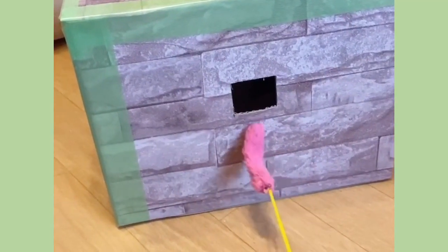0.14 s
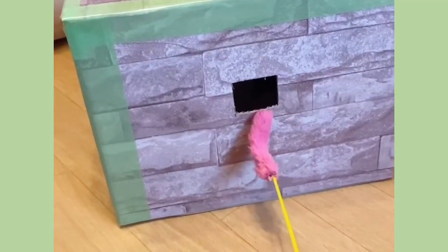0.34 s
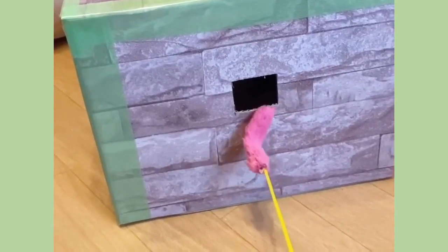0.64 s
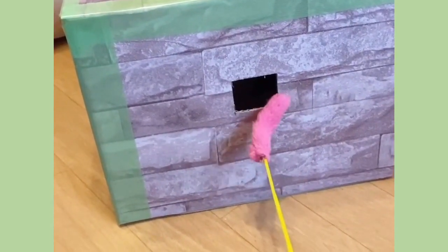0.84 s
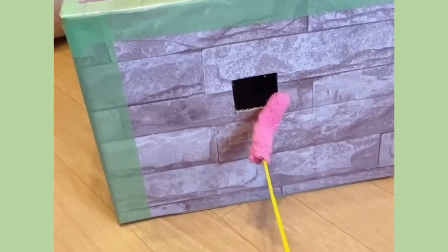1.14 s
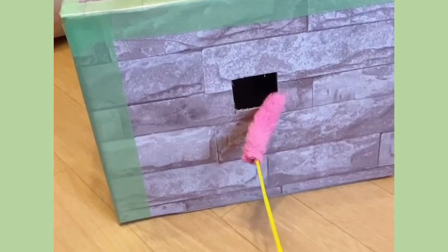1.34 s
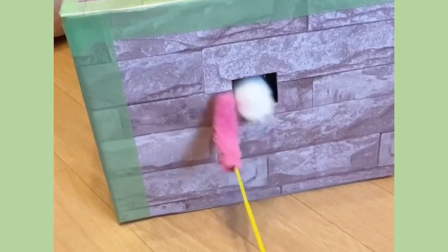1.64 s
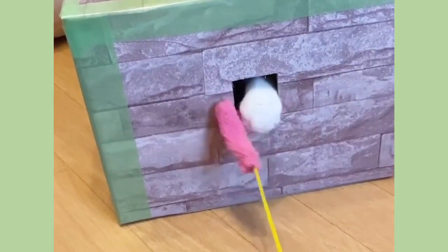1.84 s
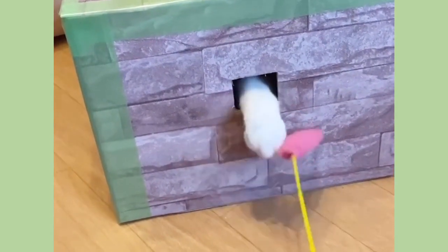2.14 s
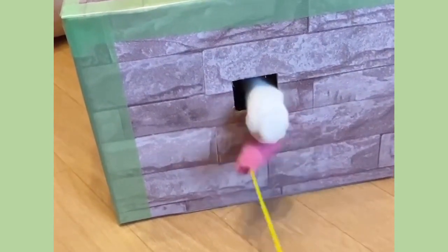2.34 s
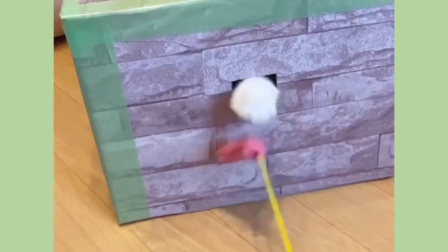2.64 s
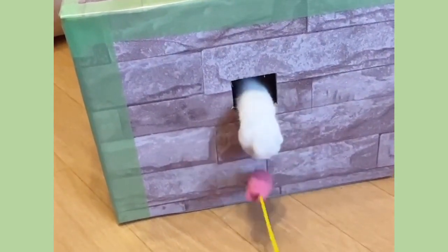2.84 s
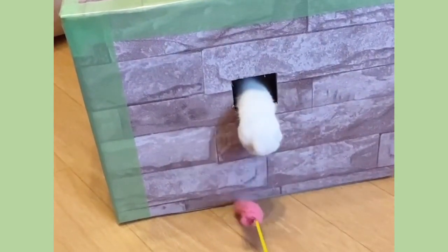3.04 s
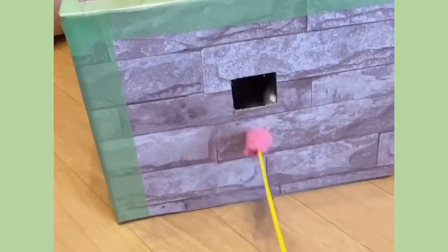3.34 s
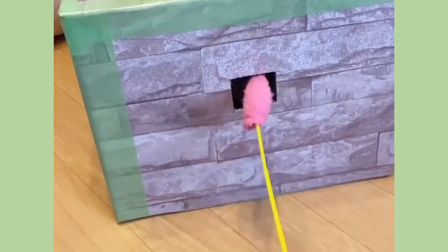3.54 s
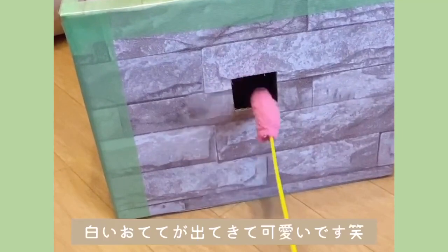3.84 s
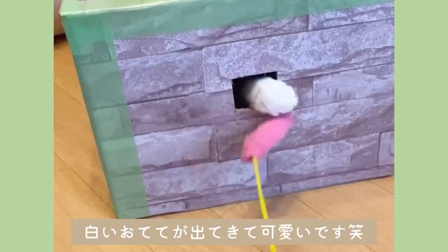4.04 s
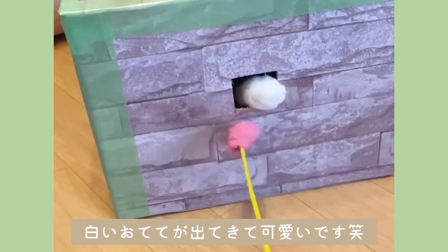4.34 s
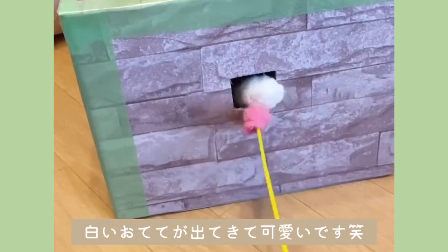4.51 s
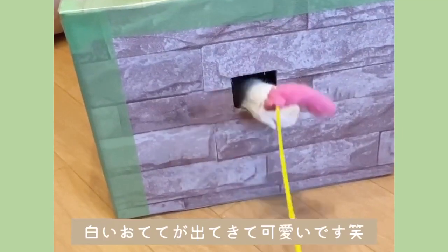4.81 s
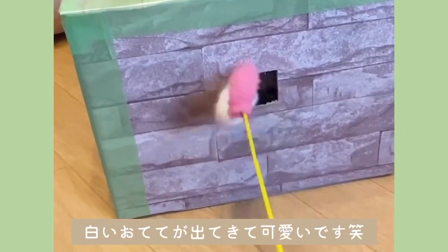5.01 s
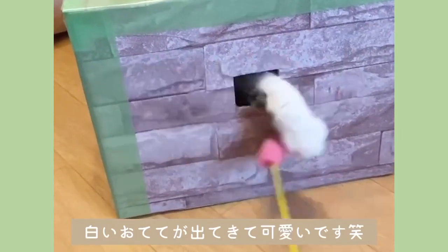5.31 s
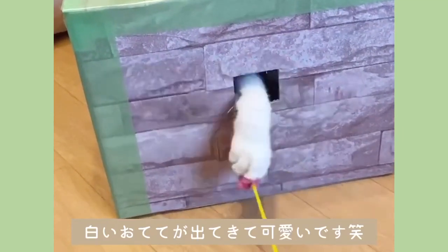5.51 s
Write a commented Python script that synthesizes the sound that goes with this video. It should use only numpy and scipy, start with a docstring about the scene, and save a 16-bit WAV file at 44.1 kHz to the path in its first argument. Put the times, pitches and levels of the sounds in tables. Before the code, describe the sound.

Hollow cardboard thunks, claw ticks and short rasping scrapes as a cat swipes at a toy through a hole, over a faint hum.

```python
"""A quiet room, close to a cardboard box in which a cat swipes at a toy through a small hole.
Impacts excite the damped modes of the walls: soft paws make them boom, hard claws and toy make them tick.
Stick-slip friction rasps and hisses as the leg drags over the rim, and the plush toy swishes on the card.
A short reverberation follows, and an appliance hums faintly behind it all."""
import sys
import numpy as np
from scipy import signal
from scipy.fft import rfft, irfft
from scipy.io import wavfile
from scipy.ndimage import uniform_filter1d

SR = 44100
rng = np.random.default_rng(int(sys.argv[2]) if len(sys.argv) > 2 else 0)


def wrap_up_sound(samples):
    """Save the sound to the file named by the first command line argument, as 16-bit audio."""
    columns = np.atleast_2d(samples).T
    # keep every value between -1 and 1, then stretch to whole-number steps
    tamed = np.clip(columns, -1, 1)
    steps = np.round(tamed * 32767).astype(np.int16)
    wavfile.write(sys.argv[1], SR, steps)


N = 250047
T = np.arange(N) / SR
FREQ = np.arange(N // 2 + 1) * SR / N

# Normal modes of the box. Each row: frequency in Hz, relative level in dB.
BOX_MODES = [(68, -27.5), (89, -3.5), (124, -4.5), (142, -1.5), (165, -2), (197, 5), (238, 5), (268, 6.5),
             (298, 3), (338, -2.5), (410, 1.5), (515, -6), (630, 2), (760, 0), (920, 2), (1110, -2.5),
             (1250, 2), (1410, 2.5), (1640, 1.5), (2040, 3.5), (2250, -13), (2750, -1), (3150, -1),
             (3900, -2), (4700, -16)]
MODE_HZ, MODE_DB = np.transpose(BOX_MODES)
# Strokes of the leg over the rim. Each row: time of full speed in seconds, hold in seconds,
# rasp level in dB, hiss level in dB.
RIM_STROKES = [(0.14, 0.12, -101, -91), (0.47, .02, -93, -91), (0.685, 0.073, -96, -87.5),
               (1.56, 0.023, -49, -63.5), (1.67, 0.021, -48.5, -74), (1.748, 0.074, -66, -76.5),
               (1.881, 0.0045, -79, -70), (1.941, 0.061, -56.5, -61.5), (2.031, 0.0095, -58.5, -71),
               (2.103, 0.003, -73, -71), (2.216, 0.028, -66.5, -78), (2.313, 0.081, -69.5, -77.5),
               (2.438, 0.03, -76, -79), (2.596, .015, -68.5, -76.5), (2.694, 0.0034, -69, -74),
               (2.73, 0.035, -80.5, -86), (2.858, 0.0021, -65, -84), (3.153, 0.036, -59, -70.5),
               (3.313, 0.0086, -58, -71.5), (3.357, 0.088, -65, -79.5), (3.553, 0.28, -82.5, -85),
               (3.861, .03, -79, -81), (3.986, 0.082, -63, -71.5), (4.093, 0.11, -65, -80),
               (4.547, 0.01, -63.5, -70.5), (4.613, 0.045, -71, -74), (4.712, 0.0052, -67, -68.5),
               (4.761, 0.011, -48.5, -58), (4.888, 0.011, -51, -58.5), (4.982, 0.003, -59.5, -64),
               (5.044, 0.0047, -50, -58), (5.1, 0.0091, -68, -73), (5.158, 0.01, -55.5, -62.5),
               (5.215, 0.03, -70.5, -70), (5.308, 0.12, -56.5, -66.5), (5.468, 0.016, -65, -72.5)]


def paw_thumps(sway_hz=135, pad_hz=440, leak_hz=46):
    """Impact excitation: a long, padded contact drives only the low modes; a push at mid-wall sways it."""
    # Each row: time in seconds, peak level in dB, contact in milliseconds, sway of the wall in dB.
    blows = [(1.544, -6.5, 2.63, 1.5), (1.553, -9, 2.03, -17), (1.576, -25.5, 3.1, -15.5),
             (1.607, -20.5, 4.9, -3.5), (1.649, -20.5, 1.2, 6), (1.68, -25, 1.73, 13),
             (1.944, -17, 2.6, 4.5), (1.961, -17, 7.9, 14), (1.972, -14, 5.26, -0.5),
             (1.992, -16, 11.1, 23.5), (2.034, -35, 9.1, -7), (2.342, -41.5, 4.6, 11.5),
             (2.699, -46, 5.3, 8.5), (2.862, -39.5, 1.8, -18.5), (3.179, -23.5, 2.46, 18),
             (3.306, -30.5, 0.96, 6.5), (3.337, -34, 0.23, 1.5), (3.506, -48.5, 3, 15.5),
             (4.007, -37, 4.5, 3.5), (4.077, -40.5, 3.3, 5), (4.122, -34, 4.55, 2), (4.196, -39, 3.36, 7.5),
             (4.596, -39.5, 3.3, 23.5), (4.723, -19.5, 2.15, 11), (4.756, -20.5, 0.75, 12.5),
             (4.779, -14, 1.86, 1), (4.84, -29.5, 3.8, -18), (4.873, -29, 4.9, 0.5), (4.921, -31, 5.1, -18),
             (4.986, -13.5, 7.16, -19), (5.047, -33.5, 5.1, 32), (5.102, -35, 7.7, 29), (5.152, -41, 4, 3),
             (5.295, -35, 4.2, 9.5), (5.317, -35, 1.9, -28), (5.405, -26, 4, 11), (5.418, -34.5, 6.8, -9),
             (5.462, -26, 6.6, -4)]
    out = np.zeros(N)
    # the deepest pressure leaks through the hole
    pad = signal.butter(4, [leak_hz, pad_hz], "band", fs=SR, output="sos")
    sway = 1 / (1 + (MODE_HZ / sway_hz) ** 4)
    for at, db, contact_ms, sway_db in blows:
        spot_db = 2 * rng.standard_normal(len(MODE_HZ))  # each spot struck favours other modes
        weights = undb(sway_db * sway + spot_db) * contact_spectrum(contact_ms)
        boom = box_ring(weights, dispersion=0.042)
        add(out, at - contact_ms / 2000, signal.sosfilt(pad, boom), db)
    return out


def claw_taps(stiff_hz=500, crack_hz=2600, crumple_db=-25, crunch_db=-20):
    """Impact excitation: brief, hard contacts ring the upper modes; flutes crumple, the paper cracks."""
    # Claws, toy and card edges. Each row: start in seconds, level in dB, contact in milliseconds,
    # crack relative to the knock in dB.
    taps = [(1.5425, -11, 0.31, -24.5), (1.6007, -21.5, 0.38, -9.5), (1.6075, -18, 1, -45),
            (1.6385, -21.5, 0.77, -10), (1.6482, -18.5, 0.26, -13.5), (1.6865, -42, .23, 10),
            (1.706, -37.5, .15, -26), (1.926, -40, 0.98, -18), (1.9404, -22.5, 1, -34),
            (2.378, -51.5, 0.19, 4), (2.864, -43.5, 0.39, -12.5), (3.321, -37, 0.13, -9),
            (3.428, -44, .38, 3), (4.115, -41, 0.34, -1.5), (4.143, -42, 0.32, -20), (4.16, -47.5, .2, 2.5),
            (4.191, -44, 0.14, 1), (4.64, -48, 0.36, -8), (4.7585, -29, 0.59, -8),
            (4.779, -28.5, 0.95, -22), (4.914, -36, 0.34, -5), (4.982, -36, 0.82, -9),
            (5.045, -45, 0.17, 6), (5.168, -46, 0.21, 15), (5.364, -38, 0.56, -20),
            (5.412, -36, 0.24, -4.5), (5.488, -44.5, 0.25, 0.5), (5.646, -51.5, 0.11, 11.5)]
    out, t = np.zeros(N), T[:SR // 3]
    skin = signal.butter(1, crack_hz, "high", fs=SR)
    upper_modes = 1 / (1 + (stiff_hz / MODE_HZ) ** 6)
    for at, db, contact_ms, crack_db in taps:
        weights = contact_spectrum(contact_ms) * upper_modes * undb(rng.standard_normal(len(MODE_HZ)))
        knock = box_ring(weights, dispersion=0.012, t60_s=0.085)
        burst = rng.standard_normal(len(t)) * fade(t, t60=0.024)
        crumple = rng.standard_normal(len(t)) * fade(t, t60=0.0099)
        knock = knock + undb(crumple_db) * signal.fftconvolve(knock, crumple)[:len(t)]
        crunch = rng.laplace(size=len(t)) * fade(t, t60=0.34)  # bent fibres crackle on
        crack = signal.lfilter(*skin, burst + undb(crunch_db) * crunch)
        add(out, at, knock / np.abs(knock).max() + undb(crack_db) * crack / np.abs(crack).max(), db)
    return out


def contact_spectrum(contact_ms):
    """A force pulse is a low-pass: it barely drives modes whose period is shorter than the contact."""
    cycles = MODE_HZ * contact_ms / 1000
    return 1 / (1 + cycles ** 4)


def box_ring(weights, dispersion, swell_cycles=0.3, t60_s=0.125):
    """Modal superposition: card damps high modes fastest; dispersive bending waves delay the low ones."""
    hz, db = MODE_HZ[:, None], MODE_DB[:, None]
    delay_s = dispersion * (hz ** -0.5 - hz.max() ** -0.5)
    t = np.maximum(T[:SR // 3] - delay_s, 0)
    build_up = 1 - np.exp(-t * hz / swell_cycles)
    t60 = t60_s * (hz / hz[1]) ** -0.72  # t60_s holds for the second mode
    modes = undb(db) * build_up * fade(t, t60) * np.sin(2 * np.pi * hz * t)
    return np.sum(weights[:, None] * modes, axis=0)


def rim_scrapes(boom_db=7, panel_db=7, panel_q=11):
    """Friction drives resonance: the leg drags over the rim, the card rasps and the walls grumble."""
    # Spectrum of the rasping card. Each row: frequency in Hz, relative level in dB.
    rasp_spectrum = [(250, 1), (600, -9.5), (900, 0.5), (1300, -2), (1750, -4.5), (2100, -8), (2600, -11),
                     (2950, -10), (3500, -17.5), (6000, -19), (12000, -55.5)]
    _, _, rasp_db, _ = np.transpose(RIM_STROKES)
    level = stroke_envelope(rasp_db)
    grit = colour(slips(grain_db=3.8, jerk_db=2, jerk_rate=180), rasp_spectrum)
    # as the contact moves, now one panel mode rings, now another
    panel = sum(resonate(grit, hz, panel_q) * undb(4 * wander(30)) for hz in MODE_HZ[MODE_HZ > 700])
    rasp = grit + undb(panel_db) * panel
    rasp = rasp / band_rms(rasp, 900, 3500)
    wall = box_ring(1 / (1 + (MODE_HZ / 330) ** 6), dispersion=0.03)
    boom = signal.fftconvolve(rng.standard_normal(N) * level, wall / np.linalg.norm(wall))[:N]
    return rasp * level + undb(boom_db) * boom


def fur_hiss():
    """Friction noise: fur hisses against the rim at each stroke, slightly wide in stereo."""
    # Spectrum of the sliding fur. Each row: frequency in Hz, relative level in dB.
    hiss_spectrum = [(1500, -11), (3000, -3), (4400, -2.5), (5200, 1), (6800, -0.5), (8500, 2),
                     (10800, 4.5), (12200, 3), (13000, 1.5), (15500, 0)]
    _, _, _, hiss_db = np.transpose(RIM_STROKES)
    friction = [slips(grain_db=1.5, jerk_db=1.45, jerk_rate=170) for _ in range(2)]
    hairs = np.array([colour(x, hiss_spectrum) for x in friction])
    hairs = hairs / band_rms(hairs[0], 8500, 12000)
    return spread(hairs, wide_hz=1000, width=0.1) * stroke_envelope(hiss_db)


def slips(grain_db, jerk_db, jerk_rate):
    """Stick-slip friction: dense, tiny impulses of uneven size that come in jerks."""
    sizes = undb(grain_db * np.minimum(rng.exponential(size=N), 6))
    catches = rng.random(N) < 0.12
    return rng.choice([-1, 1], N) * catches * sizes * undb(jerk_db * wander(jerk_rate))


def stroke_envelope(levels_db, swell_db_per_s=599, sag_db_per_s=27, release_db_per_s=340):
    """Exponential growth and decay: each stroke swells, sags and dies away; the strongest prevails."""
    out = np.zeros(N)
    for (at, hold_s, _, _), db in zip(RIM_STROKES, levels_db):
        since = T - at
        swell = swell_db_per_s * np.minimum(since, 0)
        sag = sag_db_per_s * np.clip(since, 0, hold_s)
        release = release_db_per_s * np.maximum(since - hold_s, 0)
        out = np.maximum(out, undb(db + np.maximum(swell - sag - release, -120)))
    return out


def toy(rod_at_s=3.548, rod_db=-55, rod_q=10, slide_q=2):
    """Band-limited friction noise: plush swishes along the card, and one graze rings the toy's rod."""
    # Each row: midpoint in seconds, half length in seconds, centre frequency in Hz, level in dB.
    slides = [(0.211, 0.038, 270, -69.5), (0.638, 0.054, 1360, -80.5), (0.711, 0.03, 1130, -70),
              (0.71, 0.042, 313, -72.5), (2.338, 0.12, 1200, -75.5), (3.802, 0.19, 255.3, -67),
              (3.835, 0.15, 610, -79)]
    # Resonances of the thin rod. Each row: frequency in Hz, relative level in dB.
    rod_modes = [(1460, 0.5), (1950, -6.5), (3000, -15.5)]
    out, t = np.zeros(N), T[:SR // 3]
    for at, half_s, hz, db in slides:
        swish = resonate(resonate(rng.standard_normal(N), hz, slide_q), hz, slide_q)
        out += unit(swish) * undb(db) * np.exp(-((T - at) / half_s) ** 2)
    graze = rng.standard_normal(len(t)) * fade(t, t60=0.03) * np.minimum(t / 0.008, 1)
    rod = sum(undb(db) * resonate(resonate(graze, hz, rod_q), hz, rod_q) for hz, db in rod_modes)
    add(out, rod_at_s, rod, rod_db)
    return out


def reverberation(x, first_echo_s=0.015):
    """Diffuse reflections in a small room decay exponentially, the treble absorbed soonest."""
    # Each row: frequency in Hz, reverberation time in seconds.
    decay_times = [(90, .7), (180, 0.43), (350, 0.33), (1200, 0.26), (4000, 0.15), (12000, 0.14)]
    # Each row: frequency in Hz, gain of the tail in dB.
    tail_spectrum = [(80, -22.0), (250, -13.0), (600, -13.5), (2500, -17), (10000, -21.5)]
    hz, t60s = np.transpose(decay_times)
    noise = rfft(rng.standard_normal((2, N)))
    tail = 0
    for share, t60 in zip(np.eye(len(hz)), t60s):
        band = irfft(noise * np.interp(np.log(FREQ + 1), np.log(hz), share), N)
        envelope = fade(T, t60) * np.clip(T / first_echo_s - 1, 0, 1)
        tail = tail + band * envelope / np.linalg.norm(envelope)
    response = spread(colour(tail, tail_spectrum), wide_hz=420, width=0.95)[:, :SR]
    return signal.fftconvolve(x[None], response, axes=1)[:, :N]


def appliance_hum():
    """Random modulation: two low tones waver in amplitude and phase."""
    # Each row: frequency in Hz, rms level in dB, depth of waver from 0 to 1.
    tones = [(48.7, -57.5, .06), (126, -67.5, .35)]
    hum = np.zeros(N)
    for hz, db, waver in tones:
        modulation = 1 + waver * (wander(13.0) + 1j * wander(3.2))
        hum += np.sqrt(2) * undb(db) * np.real(modulation * np.exp(2j * np.pi * hz * T))
    return hum


def room_air(level_db=-77.5):
    """Ambient noise: the still room is a faint diffuse field, strongest in the bass."""
    # Each row: frequency in Hz, relative spectral density in dB.
    air_spectrum = [(25, -12.5), (45, -4), (62, -12.5), (80, -19.5), (105, -11.5), (135, -9.5), (160, -28),
                    (290, -32.5), (380, -41), (1090, -48.5), (1500, -52), (3000, -55.5), (11000, -66),
                    (16000, -63)]
    air = colour(rng.standard_normal((2, N)), air_spectrum)
    air = air / band_rms(air[0], 150, 16000)
    return undb(level_db) * spread(air, wide_hz=344, width=0.98)


def spread(pair, wide_hz, width):
    """Stereo coherence: two unrelated sounds as mid and side, with the bass alike in both channels."""
    side = width * irfft(rfft(pair[1]) * FREQ ** 2 / np.hypot(FREQ ** 2, wide_hz ** 2), N)
    return np.array([pair[0] + side, pair[0] - side])


def resonate(x, hz, q):
    """A second-order resonance, gain 1 at its centre."""
    return signal.lfilter(*signal.iirpeak(hz, q, fs=SR), x)


def colour(x, points):
    """Spectral shaping by a curve through points of frequency in Hz and gain in dB."""
    hz, db = np.transpose(points)
    return irfft(rfft(x) * undb(np.interp(np.log(FREQ + 1), np.log(hz), db)), N)


def wander(rate):
    """Low-pass noise of rms 1: random levels, each held 1 / rate seconds, smoothed twice."""
    hold = int(SR / rate)
    steps = np.repeat(rng.standard_normal(N // hold + 1), hold)
    return unit(uniform_filter1d(uniform_filter1d(steps, hold), hold)[:N])


def fade(t, t60):
    """Exponential decay, 60 dB down after t60 seconds."""
    return np.exp(-np.log(1000) * t / t60)


def add(track, at, sound, db):
    """Superposition: lay a sound into the track with its peak at db."""
    start = int(at * SR)
    part = sound[:N - start]
    track[start:start + len(part)] += part * undb(db) / np.abs(sound).max()


def band_rms(x, lo, hi):
    """Rms between two frequencies, from the energy in the spectrum."""
    return np.sqrt(2 * np.sum(np.abs(rfft(x)[(FREQ > lo) & (FREQ < hi)]) ** 2)) / N


def unit(x):
    """Scale to rms 1."""
    return x / np.sqrt(np.mean(x ** 2))


def undb(db):
    """Decibels to amplitude ratio."""
    return 10 ** (np.asarray(db) / 20)


def scene():
    """Superposition of the box's direct sound, its reverberation and the background."""
    box = paw_thumps() + claw_taps() + rim_scrapes() + toy() + fur_hiss()
    return box + reverberation(box.mean(axis=0)) + appliance_hum() + room_air()


def record(dry, low_hz=42, top_hz=15500):
    """Phase shift and band limiting: the channels part in phase in the treble; deep bass and top are cut."""
    # Each row: frequency in Hz, phase lag of the right channel in half turns.
    phase_lag = [(0, 0), (400, .02), (900, -.16), (1200, 0), (2000, 0), (2400, .13), (3000, .03),
                 (4200, .25), (5300, 0), (6700, 1), (8100, 1), (9700, 2), (11300, 2), (12500, 3),
                 (14600, 3), (15800, 4)]
    hz, half_turns = np.transpose(phase_lag)
    right = irfft(rfft(dry[1]) * np.exp(-1j * np.pi * np.interp(FREQ, hz, half_turns)), N)
    bass_cut = signal.butter(6, low_hz, "high", fs=SR, output="sos")
    top_cut = signal.ellip(10, 0.2, 80, top_hz, fs=SR, output="sos")
    return signal.sosfilt(top_cut, signal.sosfilt(bass_cut, np.array([dry[0], right])))


dry = scene()
out = record(dry)
wrap_up_sound(out)
```